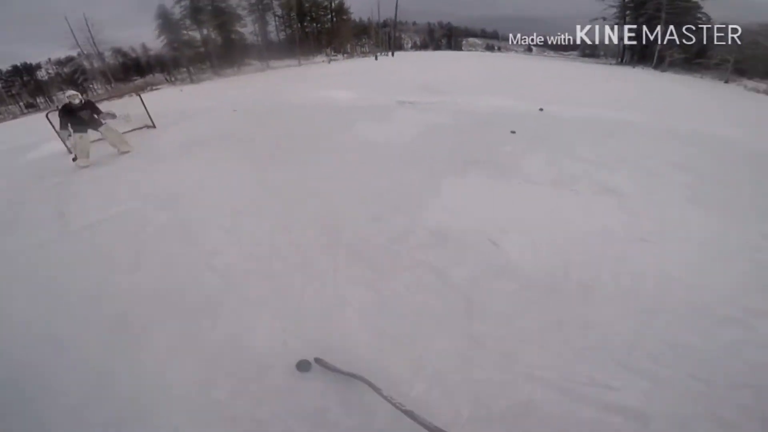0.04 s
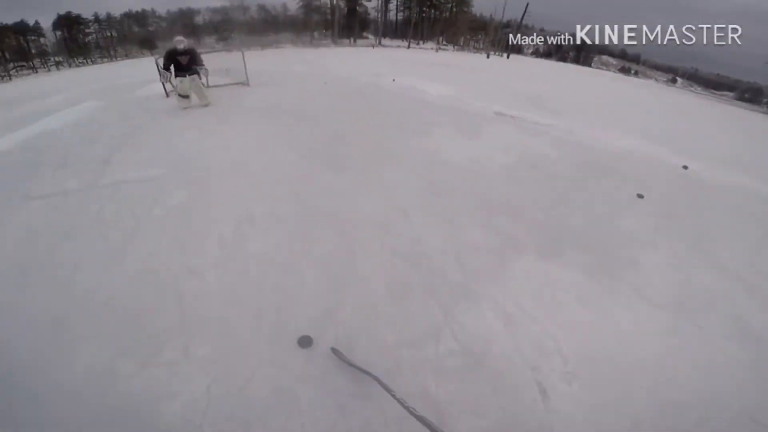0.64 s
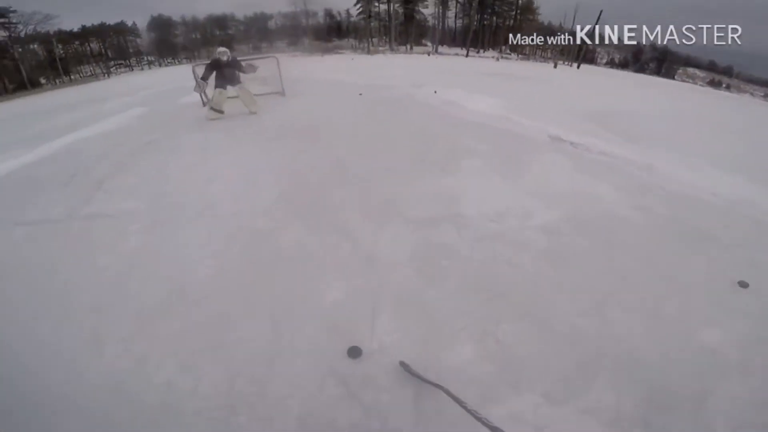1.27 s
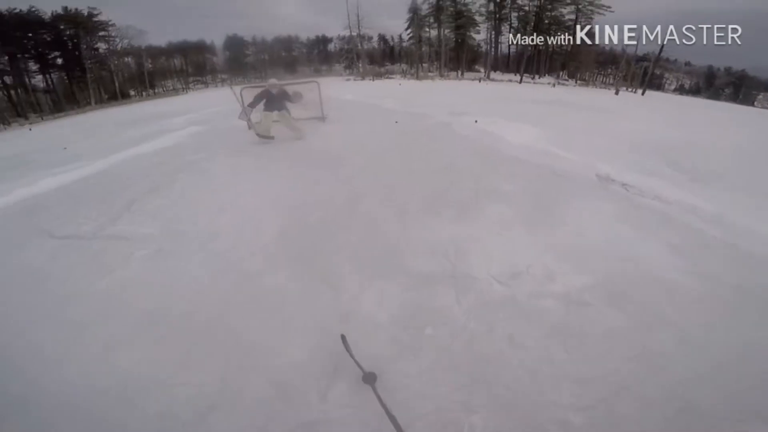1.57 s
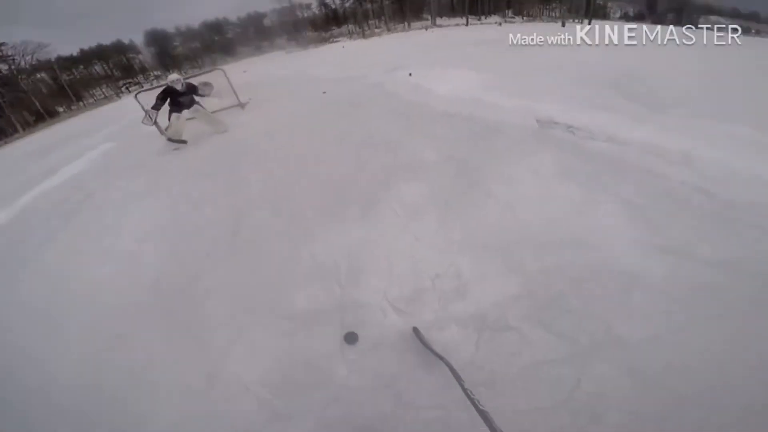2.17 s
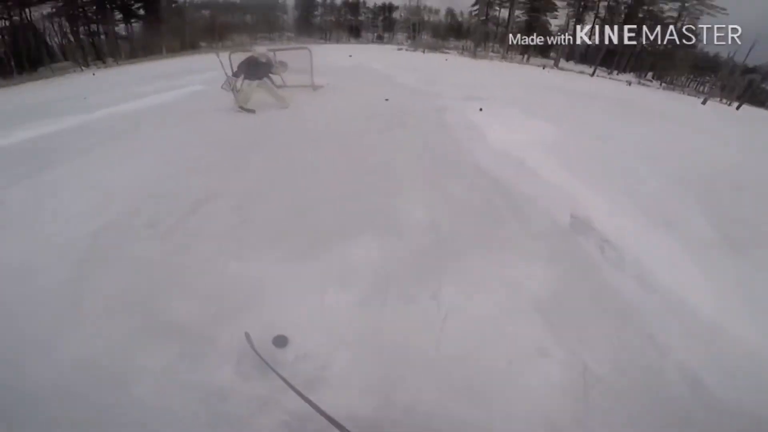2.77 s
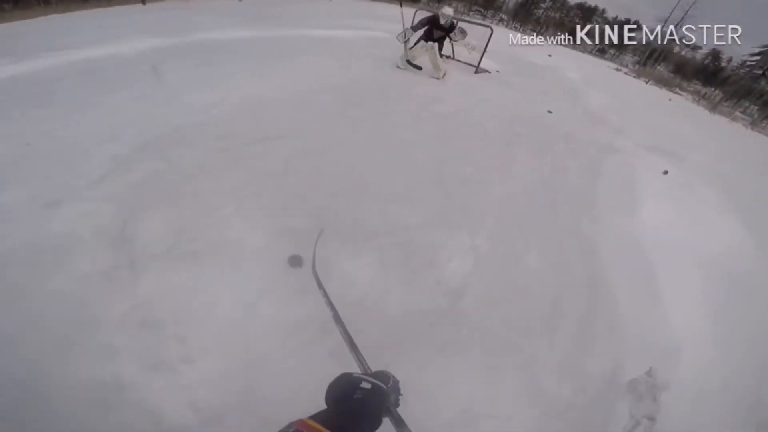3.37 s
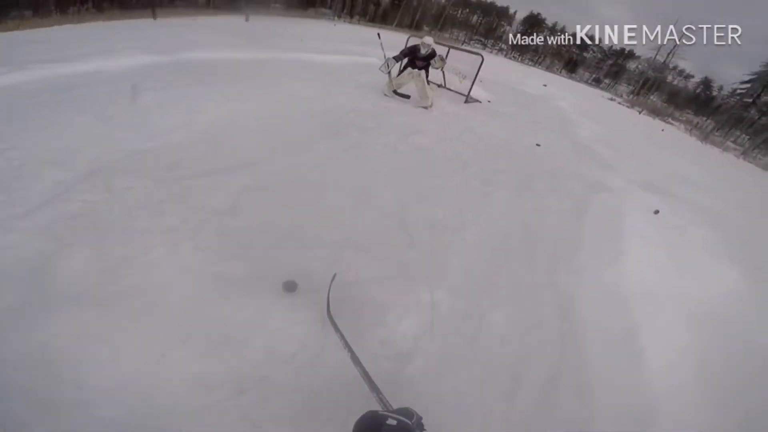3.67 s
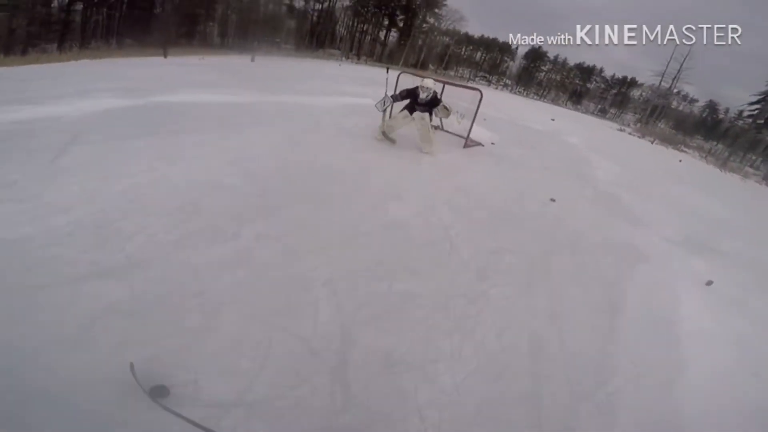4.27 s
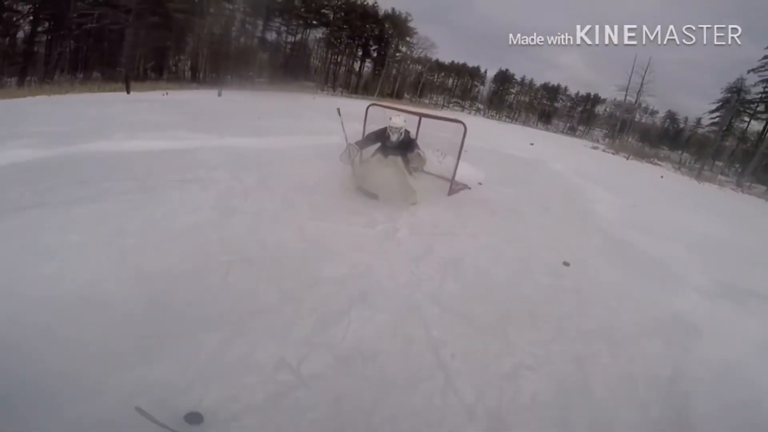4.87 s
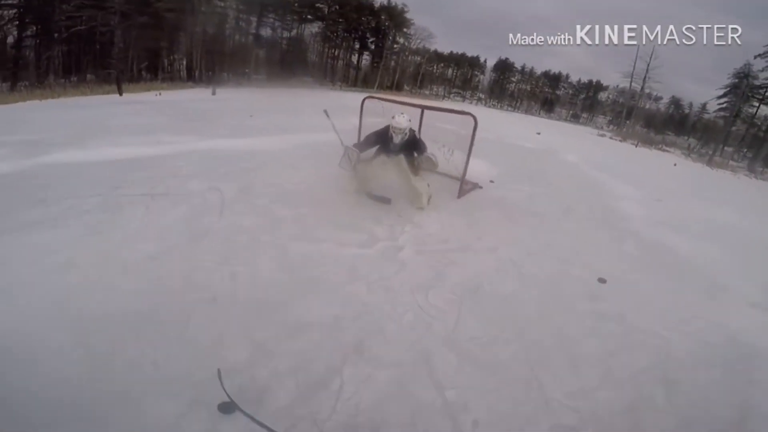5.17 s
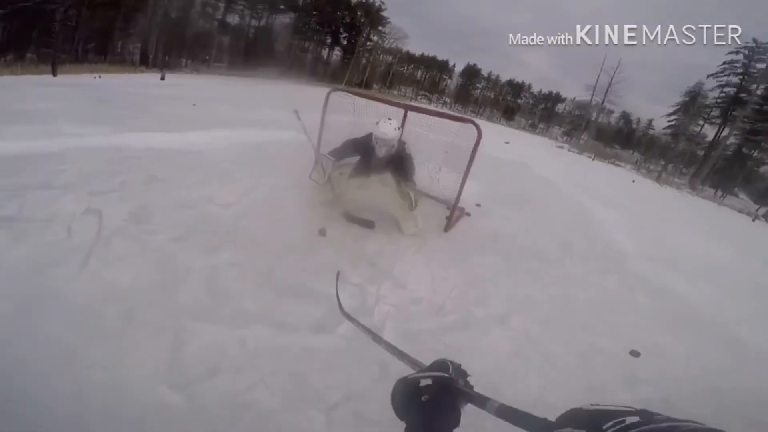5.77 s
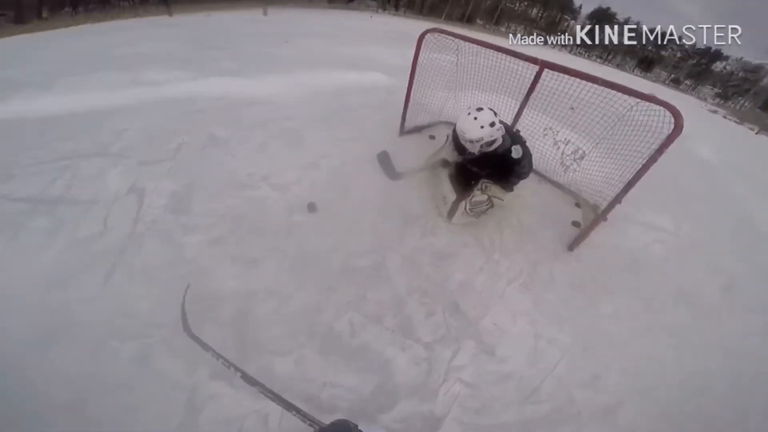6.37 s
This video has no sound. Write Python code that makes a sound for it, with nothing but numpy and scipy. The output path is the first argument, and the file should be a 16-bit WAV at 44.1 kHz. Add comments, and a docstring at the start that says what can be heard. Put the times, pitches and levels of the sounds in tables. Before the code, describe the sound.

Low wind rumbles on a head-worn microphone throughout, in open air with no echo. At about 0.2 seconds a few low thumps sound as skates land on rough ice. The blades scrape, crunch and chatter in uneven strides, biting in with crackling chips and a thin steel ring around 0.5, 1.2 and 1.9 seconds. A hockey stick clacks on a puck in short, irregular taps, several a second, close and slightly to the right. From 2.5 to 3.8 seconds the skates glide with a light sizzle and small swishes of snow, with another thump at 3.6. Gusts buffet the left side, most around 3 and 4.7 seconds. After a scrape and quick taps at 5.5 seconds, the shot comes at 5.75 as a crack and a deep thump, and the puck immediately thuds into the goalie's pads. Blades hiss, and a last skid and tap follow around 6.3 seconds.

```python
"""First come low thumps and the scrape of skates on rough outdoor ice, over a rumble of wind.
A skater carries a puck and shoots, heard from a camera worn on the head. Steel blades hiss, crunch
and chatter, the stick clacks on the puck, and near the end the shot thuds into the goalie's pads.
Moving air rumbles on the camera housing and buffets the left microphone opening."""
import sys
import numpy as np
from scipy import signal
from scipy.fft import rfft, irfft, next_fast_len
from scipy.io import wavfile
from scipy.ndimage import uniform_filter1d, map_coordinates

SR = 44100
rng = np.random.default_rng(int(sys.argv[2]) if len(sys.argv) > 2 else 0)


def unload_wav(signal):
    """Save mono or channel-first audio to the path in sys.argv[1] as 16-bit WAV at rate SR, clipped to [-1, 1]."""
    wavfile.write(
        sys.argv[1],
        SR,
        np.round(np.clip(np.atleast_2d(signal).T, -1, 1) * 32767).astype(np.int16),
    )


N = 284001


def amp(db):
    """Turn decibels into a number to multiply by."""
    return 10 ** (np.asarray(db) / 20)


def unit(x):
    """Scale a sound so that its average strength (rms) is 1."""
    return x / np.sqrt(np.mean(x ** 2) + 1e-20)


def wobble(rate):
    """A smooth random curve through `rate` new values a second."""
    return map_coordinates(rng.standard_normal(int(N * rate / SR) + 4), [np.arange(N) * rate / SR])


def stroke(start, end, rise, fall):
    """A curve that ramps up, holds and ramps down; all times are in seconds."""
    t = np.arange(N) / SR
    return np.clip((t - start) / rise + .5, 0, 1) * np.clip((end - t) / fall + .5, 0, 1)


def fade(t, t60):
    """Die away by 60 dB in t60 seconds, the fade time."""
    return np.exp(-np.log(1000) * t / t60)


def filtered(x, response):
    """Change the strength and timing of each frequency in x by response(frequency)."""
    n = x.shape[-1]
    padded = 2 * next_fast_len(n // 2 + 2048)
    return irfft(rfft(x, padded) * response(np.fft.rfftfreq(padded, 1 / SR)), padded)[..., :n]


def coloured(x, points):
    """Shape the tone of x along a curve of (frequency [Hz], level [dB]) points."""
    def response(hz):
        f, db = np.transpose(points)
        gain = amp(np.interp(np.log(hz + 1), np.log(f), db))
        cepstrum = irfft(np.log(gain))
        cepstrum[1:len(hz) - 1] *= 2  # folded so that the filter rings after a hit, never before
        cepstrum[len(hz):] = 0
        return np.exp(rfft(cepstrum))
    return filtered(x, response)


def resonance(f, hz, width_hz):
    """How strongly something that rings at hz answers each frequency f."""
    return 1j * f * width_hz / (hz * hz - f * f + 1j * f * width_hz)


def swept(x, hz, width_hz):
    """Pass x through one resonance whose pitch moves."""
    turn = np.exp(2j * np.pi * np.cumsum(hz) / SR)
    pole = np.exp(-np.pi * width_hz / SR)
    return 2 * np.real(turn * signal.lfilter([1 - pole], [1, -pole], x / turn))


def placed(pair, side_db, right_db):
    """Mix two unrelated signals to stereo: side_db widens the sound, right_db leans it to the right."""
    mid, side = pair[0], amp(side_db) * pair[1]
    lean = unit(amp([[-right_db / 2], [right_db / 2]]))
    return np.array([mid + side, mid - side]) * lean / np.hypot(1, amp(side_db))


def add(track, s, sound):
    """Mix a short stereo sound in at s seconds."""
    part = track[:, max(round(s * SR), 0):][:, :sound.shape[1]]
    part += sound[:, :part.shape[1]]


def grains(rate, spread_db, t60, bed_db):
    """Tiny cracks of uneven size, about `rate` a second, over a bed of smooth sliding noise."""
    noise = rng.standard_normal((2, N))
    sizes = (rng.random(N) < rate / SR) * amp(spread_db * np.minimum(rng.standard_normal(N), 2))
    power = signal.lfilter([1], [1, -amp(-2 * 60 / (t60 * SR))], sizes ** 2)
    return noise * np.sqrt(power / power.mean() + amp(bed_db) ** 2)


def speckled(x, depth_db):
    """Every crumb of ice has its own pitch: make small patches of time and frequency louder or softer."""
    spectrum = signal.stft(x, nperseg=256)[2]
    patches = uniform_filter1d(rng.standard_normal(spectrum.shape[1:]), size=3, axis=0)
    patches = uniform_filter1d(patches, size=4, axis=1)
    return signal.istft(spectrum * amp(depth_db * unit(patches)), nperseg=256)[1][:, :N]


def burst(t, tone, t60, rise=0.00023):
    """Two channels of noise that swell quickly and die away."""
    x = coloured(rng.standard_normal((2, len(t))) * fade(t, t60) * (1 - np.exp(-t / rise)), tone)
    return np.array([unit(x[0]), unit(x[1])])


def ring(t, modes):
    """The fading tones of a struck object; pitch and strength vary a little with each hit."""
    hz, db, t60 = np.transpose(modes)[:, :, None]
    hz = hz * (1 + 0.008 * rng.standard_normal(hz.shape))
    strength = amp(db + 1.5 * rng.standard_normal(hz.shape))
    phase = 2 * np.pi * rng.random((2, len(hz), 1))
    return unit(np.sum(strength * fade(t, t60) * np.sin(2 * np.pi * hz * t + phase), axis=1))


# Tone of air on the housing and of swirls at the microphone: (frequency [Hz], relative level [dB])
RUMBLE_TONE = [(8, -9), (20, -8.5), (33, 3.5), (45, -2.5), (62, -14.5), (100, -23.5), (200, -55.5),
               (500, -83.5)]
SWIRL_TONE = [(30, 1), (70, -1.5), (120, 2.5), (200, -2.5), (300, -10.5), (500, -26.5), (1000, -41),
              (3000, -74)]
# Moments when the airflow drops: (start [s], end [s], drop [dB])
LULLS = [(-.05, 0.226, 4), (1.117, 1.9, 1.5), (1.905, 2.493, 4.5), (3.695, 4.137, 3), (4.432, 4.544, 10.5),
         (5.77, 5.981, 11)]
# Gusts on the left microphone: (start [s], end [s], level [dB])
GUSTS = [(0.217, 0.402, -20), (1.906, 1.997, -10), (2.857, 2.996, -11), (2.978, 3.156, -14.5),
         (3.166, 3.55, -23.5), (3.59, 3.868, -15), (4.388, 4.6, -21), (4.512, 4.95, -15.5),
         (4.97, 5.378, -19.5), (5.502, 5.513, -8)]


def wind():
    """Air rumbles on the housing, growing as the skater speeds up; gusts swirl mostly on the left."""
    t = np.arange(N) / SR
    lull_db = sum(drop_db * stroke(start, end, rise=0.084, fall=0.034) for start, end, drop_db in LULLS)
    rumble_db = -16 + 0.17 * t - lull_db + 0.5 * wobble(11)
    air = coloured(rng.standard_normal((2, N)), RUMBLE_TONE)
    air /= np.sqrt(np.abs(uniform_filter1d(air[0] ** 2, size=9000)) + 1e-12)  # evens out the flow
    rumble = amp(rumble_db) * placed(air, side_db=-20, right_db=5.5)
    swirls = unit(coloured(rng.standard_normal((2, N)) * amp(0.93 * wobble(45)), SWIRL_TONE))
    gusts = sum(amp(db) * stroke(start, end, rise=0.047, fall=0.077) for start, end, db in GUSTS)
    return rumble + swirls * (amp(-35.5) + gusts * amp([[0], [-24]]))


# A coasting blade: (start [s], end [s], level [dB], pitch [Hz], resonance width [Hz])
SIZZLES = [(2.46, 2.852, -47, 6000, 380), (2.85, 3.846, -45.5, 1920, 895), (4.18, 6.124, -51.5, 3600, 900),
           (5.7, 5.967, -39.5, 3500, 1200)]


def edge_sizzle():
    """A blade edge with little weight on it sizzles in one narrow band of pitch."""
    out = np.zeros((2, N))
    for start, end, db, hz, width_hz in SIZZLES:
        sizzle = unit(filtered(rng.standard_normal((2, N)), lambda f: resonance(f, hz, width_hz) ** 2))
        out += amp(db) * stroke(start, end, rise=0.23, fall=0.089) * sizzle
    return placed(out, side_db=-28, right_db=-3)


# The ringing tones of a skate blade: (pitch [Hz], width [Hz], relative level [dB])
STEEL_RINGS = [(3730, 61, 7), (4500, 67, 0), (5340, 45, 4.5), (5630, 180, 0), (6300, 73, 1.5),
               (7250, 49, 2)]


def steel(x, ring_db):
    """The blade adds its own thin ringing to whatever shakes it."""
    def response(f):
        return 1 + amp(ring_db) * sum(amp(db) * resonance(f, hz, width) for hz, width, db in STEEL_RINGS)
    return filtered(x, response)


# Tone of snow being shaved: (frequency [Hz], relative level [dB])
HISS_TONE = [(1200, -48), (2600, 4), (3600, 0.5), (4600, -2), (5400, 1), (6200, 5), (7600, -1), (9000, -12),
             (10800, -19), (12200, -24), (15000, -50)]
# Small turns of a gliding skate: (start [s], end [s], level [dB])
TURNS = [(2.662, 2.682, -33), (2.824, 2.917, -40.5), (2.993, 3.042, -41), (3.038, 3.087, -35),
         (3.1, 3.148, -35), (3.45, 3.476, -41), (3.598, 3.645, -40)]


def snow_swishes():
    """Each small turn of a gliding skate shaves off a puff of snow."""
    hiss = speckled(coloured(rng.standard_normal((2, N)), HISS_TONE), depth_db=5)
    snow = unit(steel(hiss, ring_db=-5))
    turns = sum(amp(db) * stroke(start, end, rise=0.015, fall=0.025) for start, end, db in TURNS)
    return placed(turns * snow, side_db=-17, right_db=0.5)


# One skate takes the weight: (start [s], end [s], relative level [dB], chatter boost [dB], hiss boost [dB])
STRIDES = [(0.158, 0.36, -32.5, 1.5, -10), (0.393, 0.78, -34.5, -10, -10), (0.894, 1.156, -36.5, 1, -10),
           (1.151, 1.366, -27.5, -1, -16), (1.36, 1.61, -31.5, 4, -15), (1.699, 1.96, -27.5, -1.5, -8),
           (2.063, 2.382, -29.5, -1.5, -5.5), (2.455, 2.77, -39, 8, -5.5), (2.791, 3.276, -37.5, 4.5, -5),
           (3.403, 3.635, -34, -0.5, -6), (3.61, 3.663, -28.5, 6, -15), (3.67, 3.828, -34, 2, -9),
           (3.93, 4.175, -37.5, 11.5, -16), (4.224, 4.547, -27, -7.5, -9.5),
           (4.617, 4.748, -33.5, -0.5, -13), (5.086, 5.69, -34, 1, -5.5), (5.693, 5.928, -44.5, 12, 6.5),
           (5.912, 6.137, -41.5, -18, -2), (6.266, 6.408, -35, -2, -12)]


def stride_levels():
    """Levels of chatter, crunch and hiss: each stride leans on a blade and eases off, over a soft glide."""
    t = np.arange(N) / SR
    growth_db_per_s, easing_db_per_s = 0.48, 7.5  # the glide grows as the skater speeds up
    glide_db = np.array([[-42], [-43.5], [-48.5]]) + growth_db_per_s * t
    power = amp(glide_db) ** 2
    for start, end, db, chatter_db, hiss_db in STRIDES:
        eased_db = db - easing_db_per_s * np.clip(t - start, 0, 1)
        weight = stroke(start, end, rise=0.035, fall=0.041) * amp(eased_db)
        power += (weight * amp([[chatter_db], [0], [hiss_db]])) ** 2
    return 10 * np.log10(power)


# Tone of a blade on bumps and in snow crust: (frequency [Hz], relative level [dB])
CHATTER_TONE = [(70, -21), (150, 4), (280, 0.5), (450, -1), (700, -6), (1100, -13), (3000, -74)]
CRUNCH_TONE = [(350, -31), (750, -1.5), (1050, 3.5), (1500, 2), (2300, -1.5), (3300, -12.5), (4600, -25),
               (9000, -82)]


def skate_glide():
    """Blades chatter over bumps, crunch through crust and shave off a hiss of snow."""
    chatter_db, crunch_db, hiss_db = stride_levels()
    bumps = np.minimum(wobble(70), 1)  # uneven ice shakes all three together
    grind = grains(rate=320, spread_db=1.5, t60=0.012, bed_db=-2)
    chatter = unit(coloured(grind, CHATTER_TONE))
    crumbs = grains(rate=600, spread_db=3.6, t60=0.009, bed_db=0)
    crunch = unit(speckled(coloured(crumbs, CRUNCH_TONE), depth_db=4.5))
    hiss = unit(speckled(coloured(rng.standard_normal((2, N)), HISS_TONE), depth_db=3.5))
    return (amp(chatter_db + 1 + 2 * bumps) * placed(chatter, side_db=-11, right_db=5.5)
            + amp(crunch_db - 2.07 + 3.2 * bumps) * placed(crunch, side_db=-2, right_db=4.5)
            + amp(hiss_db + 1.6 * bumps) * placed(hiss, side_db=-11, right_db=3.5))


# Tone of cracking ice and of crust under a pushing edge: (frequency [Hz], relative level [dB])
ICE_TONE = [(1500, 1), (2800, -4), (3700, -1.5), (4300, -0.5), (5300, 2), (6500, 5), (7600, -4),
            (8300, -8.5), (9500, -16.5), (12500, -30), (15500, -42)]
CRUST_TONE = [(500, -27), (950, 9.5), (1600, 5.5), (2700, 0), (3800, -1), (5000, -19), (9000, -39)]
# An edge bites into the ice:
# (start [s], end [s], relative level [dB], crunch boost [dB], judder depth [dB], steel ring [dB])
PUSHES = [(0.474, 0.516, -32.5, 3.5, 12.5, -2), (0.557, 0.696, -32.5, 5, 6.5, 10),
          (1.165, 1.247, -30, -2, 6.5, -1), (1.283, 1.327, -30.5, 6, -1.5, -5),
          (1.788, 1.85, -34, 8, 4, -15), (1.875, 1.973, -34, -19, 8, 4), (3.21, 3.244, -29, 3, 3.5, -8),
          (5.46, 5.529, -29, 6.5, -0.5, -12), (5.826, 5.902, -34, 2.5, 2, -14),
          (1.367, 1.568, -50, 15.5, -1, -10)]


def edge_cuts():
    """On each push the edge judders through the ice in quick, crackling slips that ring the steel."""
    slips = np.minimum(wobble(130), 1.3)
    bite = coloured(grains(rate=520, spread_db=5.5, t60=0.002, bed_db=-4), ICE_TONE)
    crust = unit(speckled(coloured(rng.standard_normal((2, N)), CRUST_TONE), depth_db=3.5))
    out = np.zeros((2, N))
    for start, end, db, crunch_db, judder_db, ring_db in PUSHES:
        push = amp(db) * stroke(start, end, rise=0.0095, fall=0.063) * unit(amp(judder_db * slips))
        out += push * (amp(1.6) * unit(steel(bite, ring_db)) + amp(crunch_db - 3) * crust)
    return placed(out, side_db=-9, right_db=2.5)


# Flakes breaking off under a blade: (time [s], relative level [dB], pitch [Hz])
FLAKES = [(0.4043, -13, 5730), (0.473, -20, 6000), (0.4949, -10.5, 7000), (0.578, -13, 5500),
          (0.588, -13.5, 3720), (0.6, -19, 5300), (.627, -18, 5400), (.645, -11.5, 6000),
          (1.1642, -8, 5400), (1.1685, -5.5, 6300), (1.182, -12, 5300), (1.1927, -10, 5500),
          (1.2227, -9, 5100), (1.2354, -13, 5600), (1.253, -14, 5200), (1.2814, -16, 5500),
          (1.295, -16, 5400), (1.83, -8.5, 5660), (1.8373, -4.5, 6540), (1.891, -7.5, 5500),
          (1.913, -10.5, 5860), (1.9725, -8.5, 3800), (1.9903, -1.5, 3340), (2.043, -20.5, 7000),
          (2.111, -11.5, 3980), (2.328, -13.5, 7060), (3.6198, -14.5, 2190), (3.777, -11.5, 6200),
          (4.883, -18.5, 3800), (5.441, -15, 6000)]


def ice_chips():
    """Flakes of ice crackle, each at its own pitch, then snap free and set the steel ringing."""
    out, t = np.zeros((2, N)), np.arange(SR // 10) / SR
    snap_delay_s = 0.0029
    snap = unit(coloured(signal.unit_impulse(len(t)), ICE_TONE))
    for s, db, hz in FLAKES:
        crack = burst(t, ICE_TONE, t60=0.015, rise=0.0016)
        flake = unit(filtered(crack, lambda f: 1 + amp(3.5) * resonance(f, hz, width_hz=810)))
        add(out, s, amp(db - 25.5) * flake)
        add(out, s + snap_delay_s, amp(db - 30) * snap * rng.choice([-1, 1], size=(2, 1)))
    return placed(steel(out, ring_db=-4), side_db=-1.5, right_db=5.5)


# Tone of the stick against puck and ice: (frequency [Hz], relative level [dB])
CLACK_TONE = [(200, -18.5), (600, 1.5), (1050, -4.5), (2400, -13), (3400, -20), (4400, -21.5), (10000, -68)]
# Skids over the crust: (start [s], end [s], relative level [dB], first pitch [Hz], last pitch [Hz])
SKIDS = [(0.154, 0.193, -29, 474, 477), (3.933, 4.077, -31.5, 400, 340), (4.426, 4.451, -30, 1230, 1300),
         (4.327, 4.541, -33, 1920, 2700), (5.457, 5.533, -24.5, 1460, 1460),
         (6.258, 6.338, -32.5, 780, 960), (6.357, 6.401, -30, 1500, 1620)]


def puck_skids():
    """Stick and puck rattle on the crust; their hollow ring shifts as the puck slides along the stick."""
    out, t = np.zeros((2, N)), np.arange(N) / SR
    rattle = coloured(grains(rate=130, spread_db=3, t60=0.015, bed_db=-8.5), CLACK_TONE)
    for start, end, db, from_hz, to_hz in SKIDS:
        pitch_hz = np.interp(t, [start, end], [from_hz, to_hz])
        hollow = unit(0.1 * rattle + swept(rattle, pitch_hz, width_hz=270))
        out += amp(db + 3) * stroke(start, end, rise=0.025, fall=0.014) * hollow
    return placed(out, side_db=-12, right_db=10)


# Tone of a dull knock and of a sharp slap: (frequency [Hz], relative level [dB])
KNOCK_TONE = [(40, -10), (130, 5.5), (300, 5), (550, -2), (850, -2), (2000, -27), (6000, -79)]
SLAP_TONE = [(1000, -1), (3600, 1), (4600, -10), (7000, -14), (12000, -55)]
# Heavy blows: (time [s], relative level [dB], pitch [Hz], slap boost [dB])
BLOWS = [(.142, -9.5, 185, -19), (0.161, -14, 434, -26), (0.179, -11.5, 365, -31), (0.702, -15, 430, -13),
         (3.599, -9, 267, -26), (5.823, -6, 280, -14), (5.831, -11, 201, -13)]


def thuds():
    """Skates landing and the puck hitting the pads give a short low tone, a knock and a slap."""
    out, t = np.zeros((2, N)), np.arange(SR // 10) / SR
    for s, db, hz, slap_db in BLOWS:
        low_tone = ring(t, [(hz, 0, 13 / hz)]) * (1 - np.exp(-t / 0.00086))  # gone in 13 cycles
        knock = amp(1) * burst(t, KNOCK_TONE, t60=0.036)
        slap = amp(slap_db) * burst(t, SLAP_TONE, t60=0.018)
        add(out, s, amp(db - 21.5) * (low_tone + knock + slap))
    return placed(out, side_db=-18, right_db=5.5)


# The ringing tones of the stick's blade: (pitch [Hz], relative level [dB], fade time [s])
STICK_RINGS = [(626, -2, 0.089), (1026, 1, 0.043), (1368, 6.5, 0.023), (1603, -7.5, 0.14), (1842, 4, 0.026),
               (2310, 2.5, 0.03), (2840, -2, 0.028), (3450, -5.5, 0.037)]
# Touches of the stick: (time [s], relative level [dB], main pitch [Hz], hardness [dB])
# Hardness above 0 gives a bright crack, below 0 a dull knock.
TOUCHES = [(0.2617, -20, 2000, 0.5), (.358, -18, 1010, 3), (.361, -25, 1640, 4),
           (0.5377, -21.5, 1820, 10.5), (.701, -26, 900, -9), (0.7469, -17.5, 1600, -7.5),
           (.849, -27, 816, -0.5), (0.9388, -20.5, 1870, 5.5), (.994, -21.5, 1190, 9.5),
           (1.3492, -21.5, 1100, -8), (1.617, -22, 1370, -4.5), (1.702, -22.5, 1135, 5),
           (2.308, -30, 1480, 12.5), (2.4405, -29, 583, 1), (2.4803, -30.5, 610, 1),
           (2.678, -23.5, 835, -11.5), (2.803, -24.5, 2300, -5), (3.0252, -24, 927, -7.5),
           (3.1996, -32, 1030, -10), (3.276, -29, 1180, -5), (3.35, -30, 1075, -8), (3.606, -24, 750, -3),
           (3.7613, -27, 1135, -7), (4.1305, -19.5, 2325, -1), (4.198, -25, 620, -4),
           (4.2542, -27, 885, -11), (4.5862, -26, 1370, 9), (4.6218, -22, 970, -7.5),
           (4.8109, -18.5, 1370, -2.5), (4.9033, -19, 1012, -6.5), (5.16, -25.5, 1440, 12),
           (5.1708, -19.5, 985, -0.5), (5.3837, -20, 935, 5), (5.481, -26, 1460, -10),
           (5.495, -21, 1475, 0), (5.5123, -18, 1270, 3), (5.528, -28, 1510, 2),
           (5.6602, -26.5, 1030, -9.5), (5.774, -34, 2780, -2), (5.826, -31, 1100, -9),
           (5.8354, -38, 1200, 4), (6.3437, -23, 790, -5.5)]


def stick_taps():
    """Each touch rings the stick's blade briefly, with a knock of the puck and a crack on the ice."""
    out, t = np.zeros((2, N)), np.arange(SR // 10) / SR
    for s, db, hz, hard_db in TOUCHES:
        tilt_db = 3.5 * np.log2(hz / STICK_RINGS[1][0])  # per octave: higher touches are brighter
        main_ring = ring(t, [(hz, 0, rng.uniform(0.015, 0.038))])  # set by where the puck lands
        modes = [(f, level + tilt_db * np.log2(f / hz), t60) for f, level, t60 in STICK_RINGS]
        wood = amp(-6.5) * (ring(t, modes) + main_ring) * (1 - np.exp(-t / 0.0006))
        clack_tone = [(f, level + tilt_db * np.log2(f / hz)) for f, level in CLACK_TONE]
        clack = amp(-6) * burst(t, clack_tone, t60=0.033, rise=0.00074)
        knock = amp(-8.5 - 0.55 * hard_db - tilt_db) * burst(t, KNOCK_TONE, t60=0.037)
        cutoff_hz = min(3840 * 2 ** (hard_db / 6), SR / 3)  # a softer touch lasts longer: less treble
        lowpass = signal.butter(N=3, Wn=cutoff_hz, fs=SR, output="sos")
        body = signal.sosfilt(lowpass, wood + clack + knock)
        crack = amp(hard_db - 19) * burst(t, ICE_TONE, t60=0.023, rise=0.00085)
        add(out, s, amp(db - 4.5) * (body + crack))
        # A faint swell of noise just before each tap softens its start.
        lead_in = burst(t, CLACK_TONE, t60=0.014)[:, ::-1]
        add(out, s - len(t) / SR, amp(db - 30) * lead_in)
    add(out, 0.361, amp(-36) * ring(t, [(1628, 0, 0.22)]))  # one touch leaves a longer, thin ring
    return placed(out, side_db=-14, right_db=6)


# The low tones of the stick's shaft: (pitch [Hz], level [dB], fade time [s])
SHAFT_RINGS = [(235, -2.5, 0.022), (447, -3.5, .024), (794, -12, 0.013)]


def shot():
    """The stick slams the puck away: a crack of its blade, then a deep thump as the shaft unbends."""
    out, t = np.zeros((2, N)), np.arange(SR // 10) / SR
    shot_s, shaft_delay_s = 5.7482, 0.00248
    shaft = sum(amp(db) * fade(t, t60) * np.sin(2 * np.pi * hz * t) for hz, db, t60 in SHAFT_RINGS)
    add(out, shot_s, amp(-25.5) * burst(t, SLAP_TONE, t60=0.0067, rise=0.00035))
    add(out, shot_s + shaft_delay_s, shaft + amp(-30) * burst(t, KNOCK_TONE, t60=0.057))
    return placed(out, side_db=-26, right_db=0)


# The housing bends sound on its way to the two microphones: (frequency [Hz], left's head start [radians])
LEFT_LEAD = [(300, -0.48), (700, 1.72), (900, 1), (2300, 1.3), (3500, -0.49), (4500, 1.36), (6000, -1.43),
             (9000, -1.66)]


def scene():
    """Open air with no echo; sounds from the ice reach the two microphones slightly out of step."""
    skates = skate_glide() + edge_sizzle() + edge_cuts() + ice_chips()
    ice = skates + stick_taps() + puck_skids() + thuds() + shot() + snow_swishes()
    hz, lead = np.transpose(LEFT_LEAD)
    return wind() + filtered(ice, lambda f: np.exp(0.5j * np.outer([1, -1], np.interp(f, hz, lead))))


def record(dry):
    """The camera flattens peaks that are too loud and drops the very highest treble."""
    return filtered(np.clip(dry, -1, 1), lambda hz: hz < 15200)


dry = scene()
out = record(dry)
unload_wav(out)
```